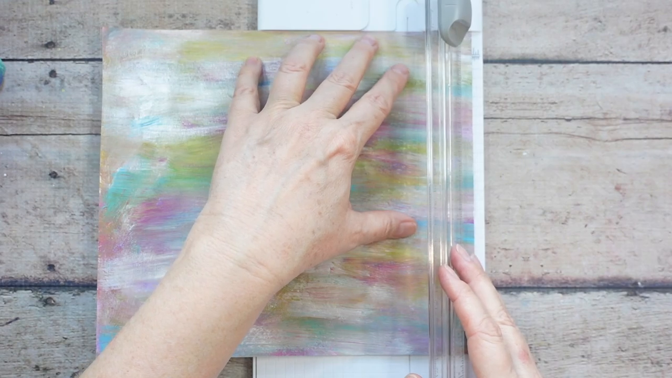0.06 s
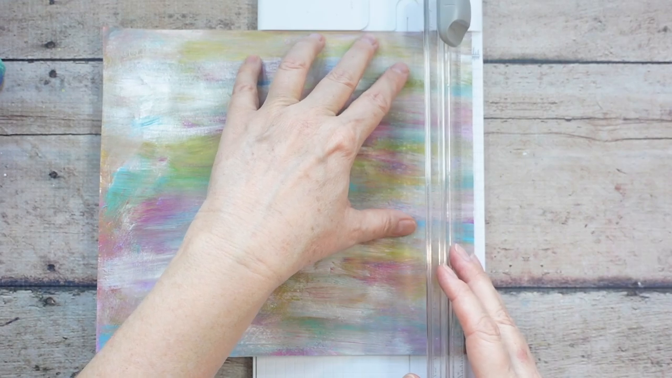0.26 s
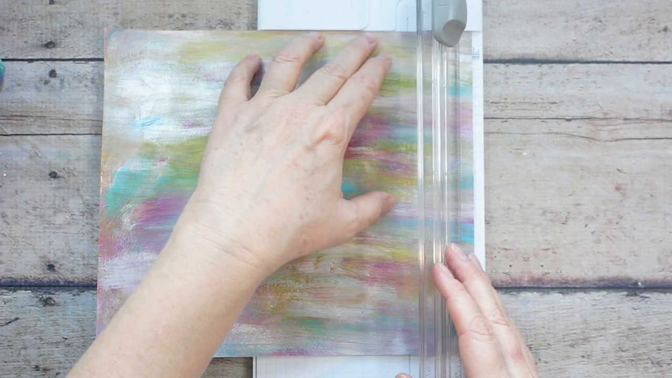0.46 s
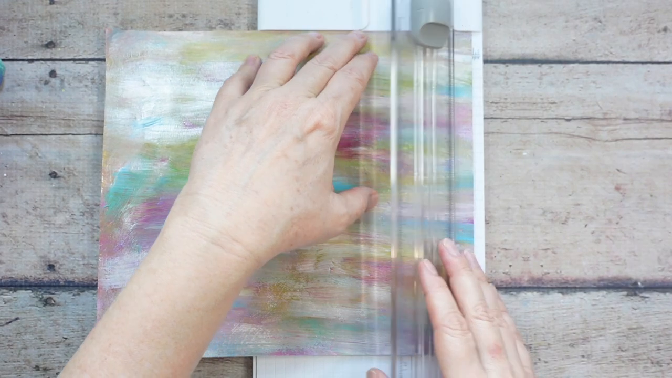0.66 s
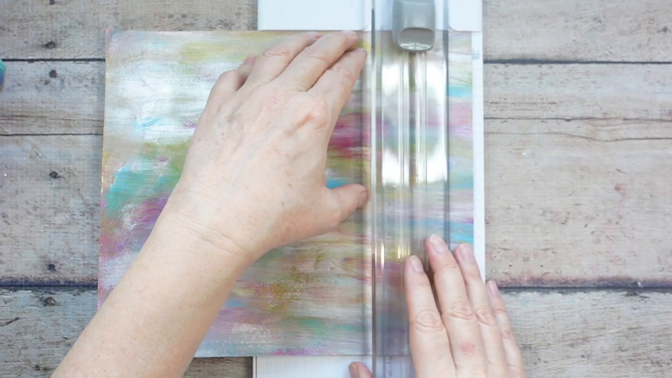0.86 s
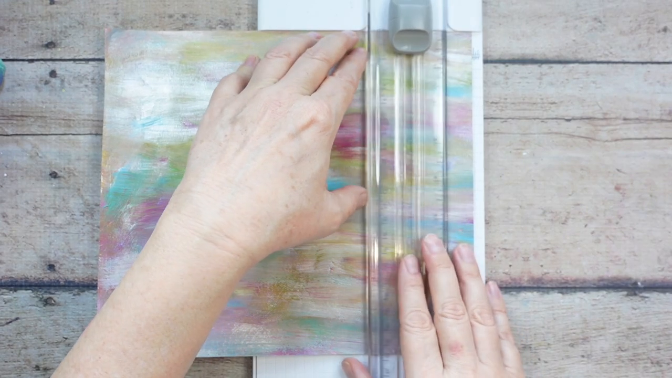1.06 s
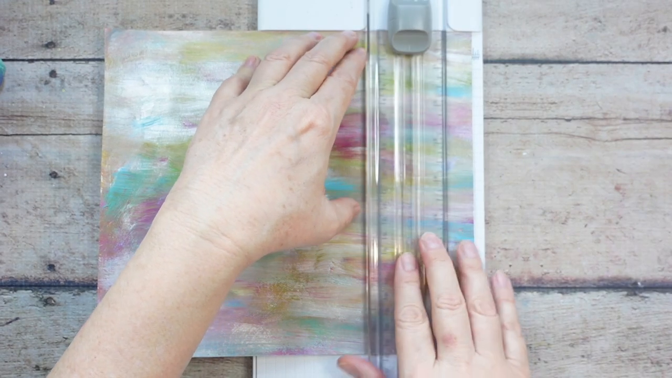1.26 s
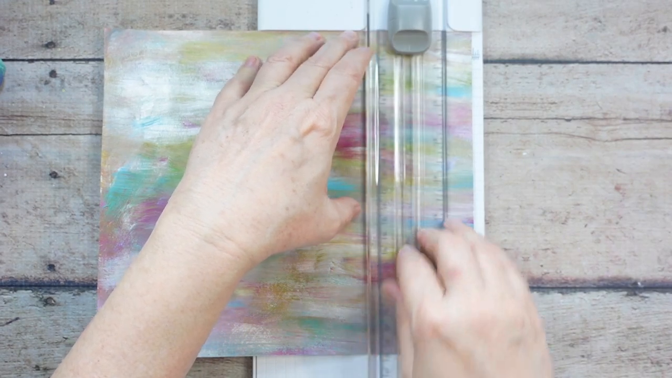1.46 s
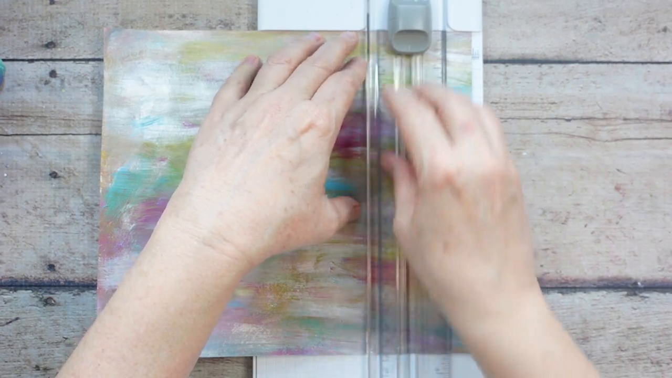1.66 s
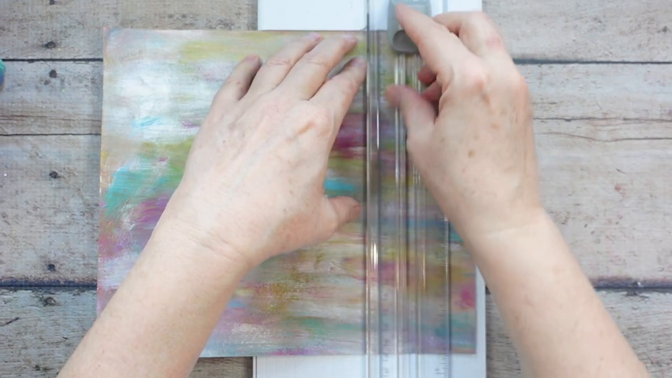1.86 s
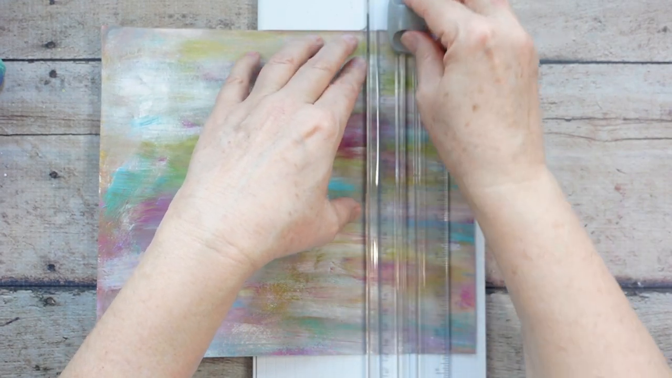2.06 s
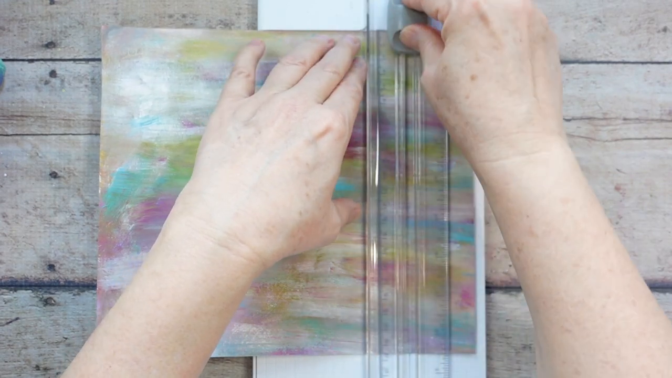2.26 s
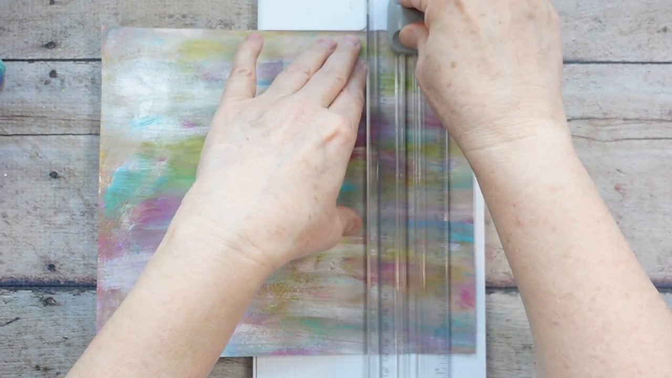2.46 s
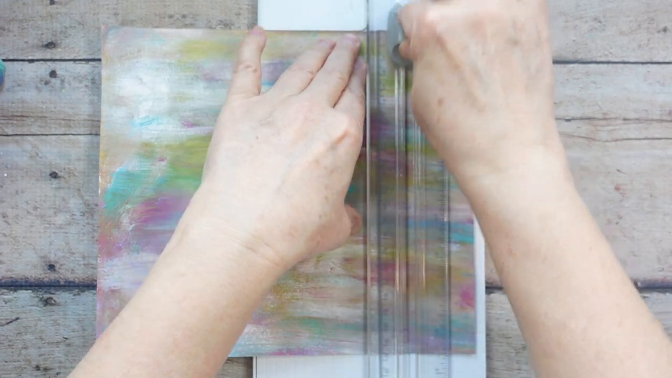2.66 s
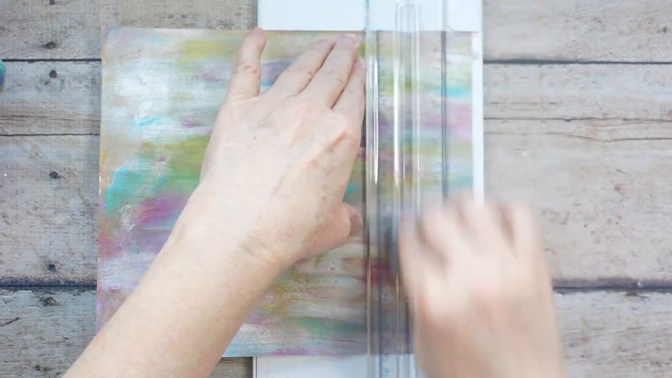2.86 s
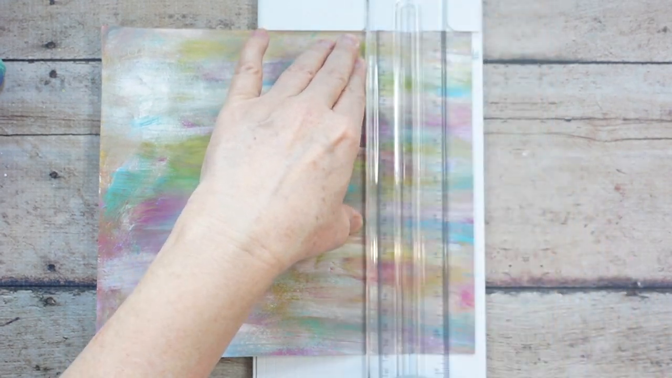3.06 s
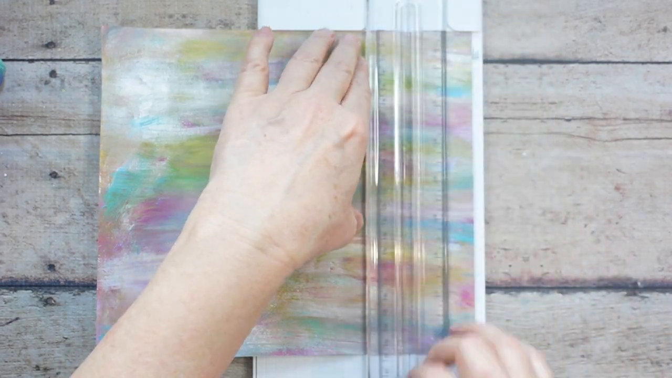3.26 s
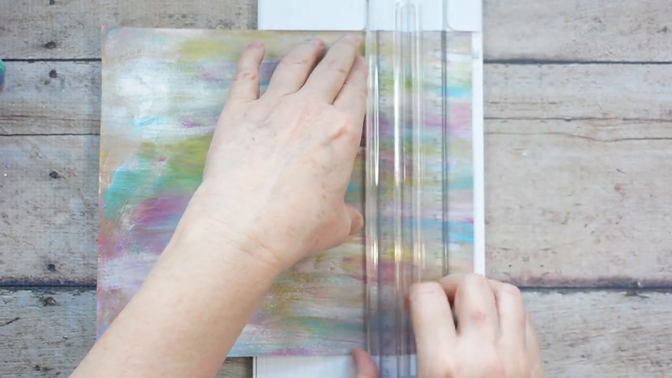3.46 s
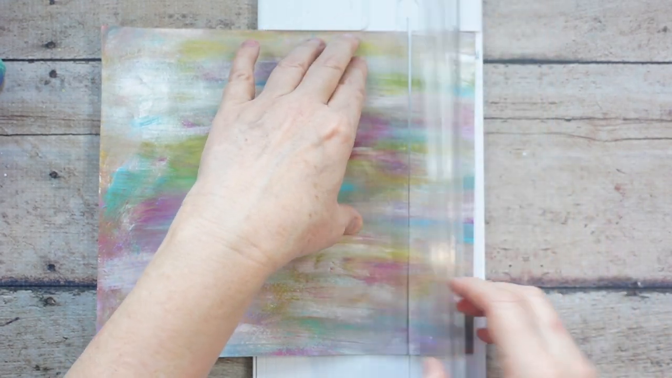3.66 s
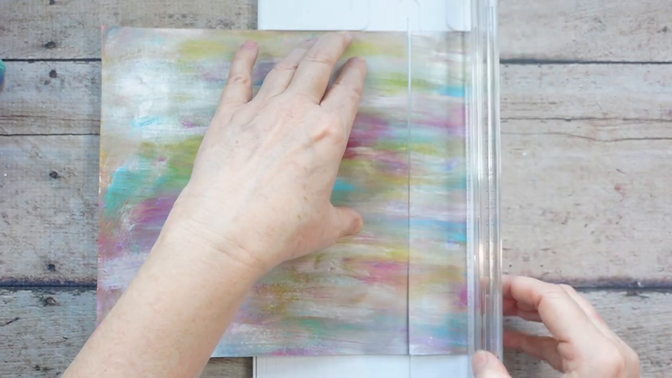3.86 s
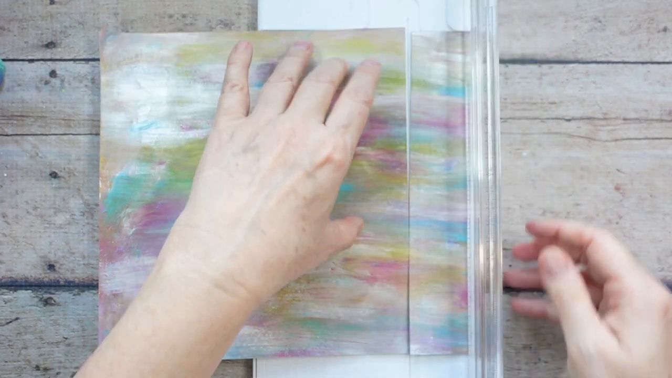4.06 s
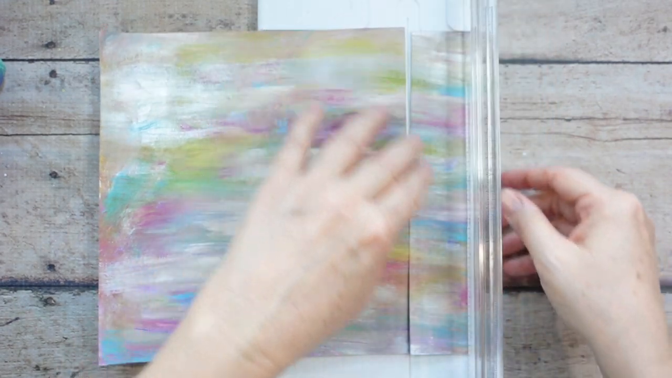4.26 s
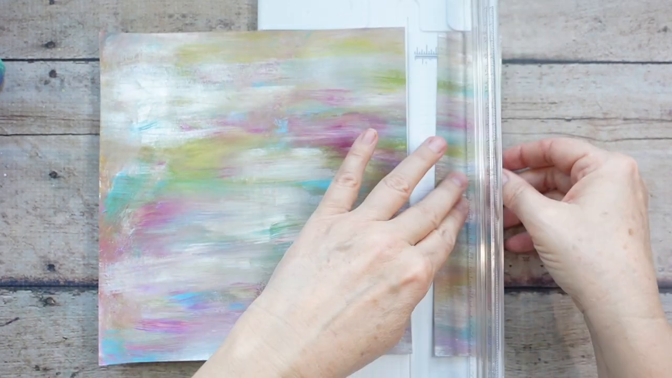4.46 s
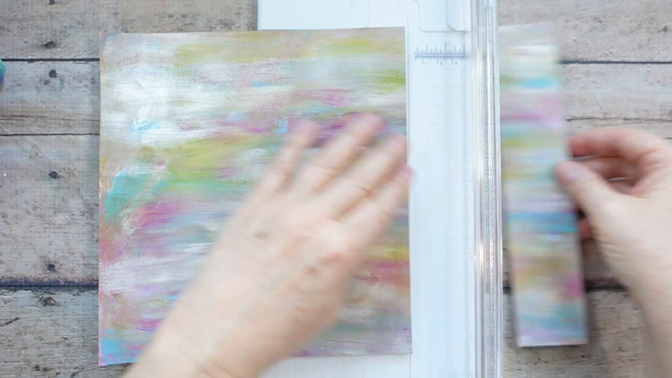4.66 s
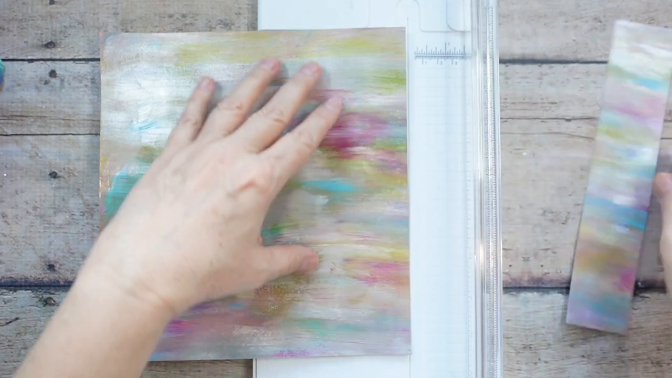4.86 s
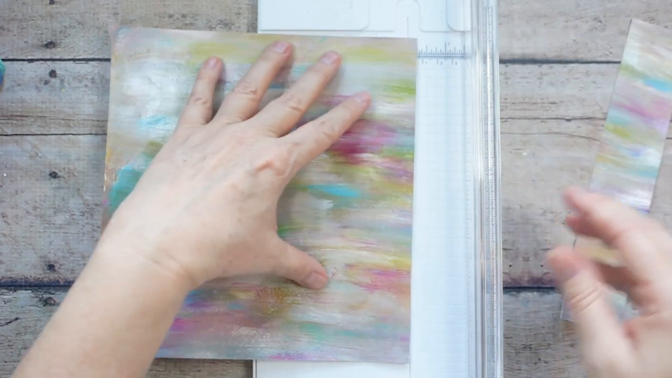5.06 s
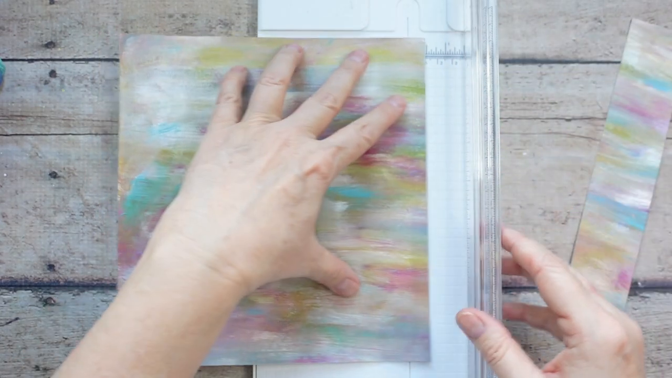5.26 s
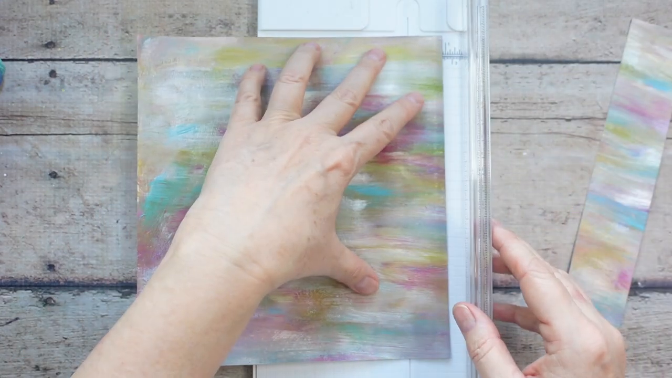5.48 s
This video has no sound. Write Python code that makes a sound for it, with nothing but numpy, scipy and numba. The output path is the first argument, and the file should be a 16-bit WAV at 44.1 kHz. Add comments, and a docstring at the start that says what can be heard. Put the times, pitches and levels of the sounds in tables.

```python
"""A paper trimmer's blade cuts a sheet in one stroke: the carriage judders along its plastic rail and
shakes trimmer and table, while the blade snaps fibres and sings in its slot. Before the cut the sheet
is slid under the rail; after it the rail is lifted with a clatter, the strip is pulled out and laid
aside, and the sheet is pushed back. Fingers knock and rub on the plastic; paper drags over the board
and its edges snap free. Heard close up, in a small room with a faint fan."""
import sys
import numpy as np
from scipy import signal
from scipy.fft import rfft, irfft
from scipy.io import wavfile
from scipy.ndimage import uniform_filter1d
from numba import njit

SR = 44100
rng = np.random.default_rng(int(sys.argv[2]) if len(sys.argv) > 2 else 0)


def to_wav(sig):
    """Store sig (one row per channel, or 1-D mono) as 16-bit WAV at the path in sys.argv[1].

    Samples outside -1..1 are clipped; the rate is SR.
    """
    pcm = np.clip(np.atleast_2d(sig), -1, 1) * 32767
    pcm = np.round(pcm).astype(np.int16)
    wavfile.write(sys.argv[1], SR, pcm.T)  # frames by channels


N = 243431
TIME = np.arange(N) / SR
AGE = np.arange(8192) / SR  # seconds since a blow

# The pull of the blade. Each row: time in seconds, then faders in dB for carriage rasp and tearing.
STROKE = [(2.62, -75, -82), (2.668, -45.5, -53), (2.71, -39, -45.5), (2.745, -49, -44), (2.805, -34, -35.5),
          (2.92, -32.5, -31), (3.041, -42, -45), (3.11, -61.5, -62.5), (3.19, -99, -77)]
# The blade sings as it starts, runs and leaves the paper.
# Each row: centre and half length in seconds, pitch in Hz, level in dB.
WHISTLES = [(2.692, 0.031, 8370, -51), (2.927, .08, 8500, -46.5), (3.034, 0.02, 6960, -45.5)]
# Ringing of trimmer and table. Each row: pitch in Hz, relative level in dB, 60 dB decay in seconds.
TRIMMER_MODES = [(80, -9, .18), (112, -5, .16), (168, -5, .18), (205, -8, .08), (300, -7, .06),
                 (363, -8, .11), (520, -2, .06), (630, -2, .05), (733, 1, .11), (848, -1, .07),
                 (1037, 1, .11), (1101, -1, .1), (1167, 0, .1), (1234, 0, .1), (1371, 1, .09),
                 (1425, -2, .06), (1549, -2, .05), (1647, -3, .04), (1724, -3, .04)]
# Tone of carriage rasp, tearing fibres and table rumble. Each row: frequency in Hz, gain in dB.
RASP_EQ = [(30, -75), (240, -28), (400, -21), (520, -10), (740, 5), (1060, -0.5), (1500, 3.5), (2400, 10),
           (4000, -15), (8000, -66)]
TEAR_EQ = [(30, -109), (1200, -2), (2000, -5.5), (2900, -2.5), (4100, 1), (5200, 1), (7000, -0.5),
           (8500, -0.5), (11300, -10), (13200, -10), (15800, -29)]
RUMBLE_EQ = [(20, -83), (45, -33), (70, -28), (110, -18.5), (170, -9.5), (240, -6.5), (340, 4), (500, 0.5),
             (800, -24.5)]

# Knocks of fingers, rail and carriage. Each row: start in seconds, shell fader in dB,
# main ring in Hz, table thud fader in dB, contact click fader in dB.
KNOCKS = [(0.641, -54.5, 1150, -88, -62), (1.103, -47.5, 562, -69.5, -49), (1.519, -47.5, 1300, -68.5, -60),
          (1.619, -61, 890, -79, -59), (1.684, -52.5, 854, -67, -63.5), (2.095, -55, 870, -89, -57.5),
          (2.118, -56.5, 1910, -82, -50.5), (2.143, -52.5, 1310, -77, -81),
          (2.273, -50.5, 1327, -69, -52.5), (2.595, -65, 860, -91, -62), (2.645, -52, 990, -82, -57),
          (2.922, -23, 1160, -67, -44), (3, -31.5, 1320, -54, -40), (3.069, -40, 1375, -71, -45),
          (3.224, -40, 533, -65.5, -51.5), (3.256, -43, 1260, -66.5, -56), (3.307, -40.5, 1350, -84, -57.5),
          (3.395, -52.5, 1290, -70.5, -50.5), (3.514, -41.5, 841, -64, -51), (3.819, -43.5, 827, -63, -64),
          (3.844, -39.5, 1410, -64, -60), (3.891, -39.5, 1400, -67, -61), (4.081, -51, 860, -82.5, -57),
          (4.474, -47, 1505, -71.5, -65), (4.602, -42, 873, -85, -54), (5.359, -69, 980, -70.5, -69)]
# Fingers and hinge rubbing on the rail. Each row: centre and half length in seconds,
# skin hiss in dB, rail rattle in dB, rattle centre in Hz, squeak in dB.
RUBS = [(1.574, 0.0099, -60, -58, 900, -66), (1.59, 0.13, -78, -69.5, 380, -100),
        (1.837, 0.095, -77.5, -73.5, 500, -75.5), (2.351, 0.029, -64.5, -61, 700, -99),
        (3.231, 0.014, -65, -52, 520, -88), (3.497, 0.024, -61, -59.5, 1220, -75),
        (3.849, 0.021, -77, -48.5, 1490, -81), (3.898, 0.021, -72, -48.5, 1490, -95),
        (4.617, 0.012, -51.5, -62, 1510, -66)]
# Tone of plastic shell, table thud, clicks and skin. Each row: frequency in Hz, gain in dB.
SHELL_EQ = [(30, -52), (200, -30.5), (450, -0.5), (800, 4.5), (1400, 1), (2200, 0.5), (3500, -9.5),
            (5000, -7), (7000, -40), (12000, -66)]
THUD_EQ = [(20, -86), (45, -38), (70, -4.5), (120, 4), (200, 4), (350, 3), (700, -33), (2000, -94)]
CLICK_EQ = [(100, -42), (1000, -4), (2500, -10), (4500, -3), (9000, -13), (15000, -30)]
SKIN_EQ = [(300, -63), (2000, -4), (4500, 5), (7000, 0), (10000, -9), (15000, -19)]

# Paper edges snapping and ticking. Each row: start in seconds, level in dB, ring pitch in Hz,
# its 60 dB decay in seconds, then crack and flutter in dB relative to the level.
SNAPS = [(0.639, -35.5, 3300, 0.003, -7, -10), (1.0941, -31.5, 3840, 0.0031, -20, -43),
         (1.1, -33.5, 4170, 0.0022, -19, -19), (1.318, -61.5, 4500, 0.0036, 7, -16),
         (1.347, -59.5, 4430, 0.0031, 5, -11), (3.329, -55, 2600, 0.004, -4, -18),
         (3.804, -63, 6100, 0.0022, 8, -9), (4.149, -50.5, 6430, 0.0049, -6, -14),
         (4.0048, -21, 3050, 0.0046, -17.5, -25), (4.068, -52.5, 3150, 0.048, -17, -12),
         (4.6712, -32.5, 2380, 0.052, -23, -8), (4.68, -29.5, 2200, 0.013, -17, -35),
         (4.8063, -40, 2690, 0.014, -14, -10.5), (4.911, -40, 7040, 0.0059, -9, -7.5)]
# Pushes of sheet and strip. Each row: start, rise and hold in seconds, first and last edge pitch in Hz,
# then faders in dB for hiss, edge ring, broad sheet ring and board scrape.
SLIDES = [(0.314, 0.16, 0.092, 3440, 3150, -67.5, -67.5, -86, -80),
          (0.606, 0.033, 0.16, 3230, 3120, -75.5, -74.5, -75.5, -72.5),
          (1.14, .045, 0.042, 3370, 3330, -73, -71, -79, -84),
          (1.28, 0.027, 0.048, 3450, 3430, -76, -96, -96, -94),
          (4.36, 0.045, 0.058, 4900, 2530, -49, -67, -60.5, -62.5),
          (4.49, .02, 0.031, 3520, 3500, -70.5, -77, -84, -75),
          (4.551, 0.011, 0.049, 4620, 3920, -66, -63.5, -58, -63),
          (4.631, 0.036, .003, 2660, 2350, -66, -56, -52, -56.5),
          (4.803, .008, 0.096, 2570, 4440, -69.5, -58, -56.5, -69),
          (4.955, 0.21, 0.058, 4300, 5300, -69, -64.5, -61.5, -68),
          (5.229, 0.08, 0.089, 4700, 4750, -56.5, -69, -71, -60.5)]
# Tone of paper hiss and board scrape. Each row: frequency in Hz, gain in dB.
HISS_EQ = [(300, -72), (2500, -12), (4500, -3), (7000, -5), (9000, -10), (12000, -18), (15500, -46)]
SCRAPE_EQ = [(40, -34), (150, -12), (400, -14.5), (900, 1.5), (1600, -0.5), (2500, -5.5), (5000, -24)]

# Tone of the room noise. Each row: frequency in Hz, gain in dB.
AIR_EQ = [(18, -101), (30, -54), (114, -16), (402, -13), (483, -13), (628, -14), (883, -1.5), (1060, -16),
          (1450, -9.5), (2390, -19), (15800, -32.5)]
# Resonances of the fan. Each row: centre in Hz, filter width in Hz, relative gain in dB.
FAN_RESONANCES = [(871.8, 24.6, -9.5), (952, 100, -19.5), (1416, 220, -35), (1872, 56, -23)]

RUMBLE_DB, RUMBLE_GROWTH = -43.5, 1.68  # table rumble at full pull, and dB gained per dB of rasp
CONTACT_S = 0.0019  # time for a blow to build up
SLIDE_RELEASE_S = 0.17  # a push dies away by 60 dB in this time
GLIDE_BEND = 3.1  # the edge pitch moves slowly at first, then faster
HISS_DB_PER_OCT, SCRAPE_DB_PER_OCT = 19, -9.5  # a rising edge pitch brings more hiss, less scrape
AIR_DB, TOP_HZ = -68, 15850


def blade_stroke():
    """The carriage judders along the rail and shakes the trimmer while the blade snaps fibres."""
    times, rasp_db, tear_db = np.transpose(STROKE)
    pull = swell(times, rasp_db)
    grip = walk(260)  # the blade catches and frees itself
    judder = slips(rate=3400, spread_db=2.5) * undb(2.2 * grip)
    body = unit(through(judder, trimmer_ring(dense_db=1, dense_t60=.05))) + undb(-6) * judder
    rasp = undb(-1.5) * unit(colour(body, RASP_EQ)) * pull
    rumble = undb(RUMBLE_DB) * unit(colour(body, RUMBLE_EQ)) * (pull / pull.max()) ** RUMBLE_GROWTH
    fibres = slips(rate=12000, spread_db=2.5) * undb(.6 * grip)
    # the steel blade colours the tearing with its own short rings
    steel = sum(resonate(fibres, hz, width=80) for hz in (3940, 4190, 5980, 7800))
    tear = undb(-1.47) * unit(colour(fibres + undb(-5) * steel, TEAR_EQ)) * swell(times, tear_db)
    chatter = slips(rate=13000, spread_db=5.5)
    whistle = sum(undb(db) * bump(centre, half) * unit(steep_band(chatter, hz, width=920))
                  for centre, half, hz, db in WHISTLES)
    return rasp + rumble + tear + whistle


def trimmer_ring(dense_db, dense_t60):
    """Trimmer and table answer a tap with clear modes among many short-lived ones."""
    clear = sum((-1) ** k * undb(db) * np.sin(2 * np.pi * hz * AGE) * fade(t60)
                for k, (hz, db, t60) in enumerate(TRIMMER_MODES))
    dense = rng.standard_normal(len(AGE)) * fade(dense_t60)
    return unit(clear) + undb(dense_db) * unit(dense)


def plastic_knocks():
    """Each blow clicks at the contact, rings the plastic shell and thuds into the table."""
    out = np.zeros(N)
    attack = 1 - np.exp(-AGE / CONTACT_S)
    click_shape = fade(0.0042) * attack + undb(-18) * fade(0.053)
    for start, shell_db, hz, thud_db, click_db in KNOCKS:
        ring = trimmer_ring(dense_db=14, dense_t60=0.04) * attack
        # the place struck favours one briefly ringing mode
        main_mode = unit(np.sin(2 * np.pi * hz * AGE) * fade(.035) * attack)
        shell = unit(colour(ring * fade(0.05), SHELL_EQ)) + undb(0.5) * main_mode
        thud = unit(colour(ring, THUD_EQ))
        click = unit(colour(rng.standard_normal(len(AGE)) * click_shape, CLICK_EQ))
        knock = undb(shell_db - 23) * shell + undb(thud_db - 8) * thud + undb(click_db - 17.5) * click
        add(out, start, knock)
    return out


def rail_rubs():
    """Skin whispers and squeaks on the rail, which rattles low under a finger, higher in its hinge."""
    skin = unit(colour(slips(rate=12000, spread_db=1.5), SKIN_EQ))
    shaken = through(slips(rate=1500, spread_db=0.5), trimmer_ring(dense_db=19.5, dense_t60=0.03))
    shell = unit(colour(shaken, SHELL_EQ))
    squeak = unit(resonate(skin, hz=10200, width=990))
    out = np.zeros(N)
    for centre, half, skin_db, rattle_db, hz, squeak_db in RUBS:
        rattle = unit(resonate(shell, hz, width=1.43 * hz))
        rub = undb(skin_db) * skin + undb(rattle_db) * rattle + undb(squeak_db) * squeak
        out += bump(centre, half) * rub
    return out


def paper_snaps():
    """A paper edge springs free: a crack, a brief ring of the sheet, then flutter."""
    out = np.zeros(N)
    for start, db, hz, t60, crack_db, flutter_db in SNAPS:
        ring = resonate(np.sin(2 * np.pi * hz * AGE) * fade(t60), hz, width=4300)
        crack = unit(colour(rng.standard_normal(len(AGE)), CLICK_EQ)) * fade(0.009)
        flutter = unit(steep_band(rng.standard_normal(len(AGE)), hz, width=0.98 * hz)) * fade(0.095)
        add(out, start, undb(db) * (ring + undb(crack_db) * crack + undb(flutter_db) * flutter))
    return out


def paper_slides():
    """Paper drags over the board; as its free length changes, the edge resonance glides."""
    drag = undb(0.74 * walk(110))
    hiss = unit(colour(slips(rate=11000, spread_db=-1), HISS_EQ))
    scrape = unit(colour(slips(rate=5400, spread_db=1), SCRAPE_EQ))
    edge_slips, sheet_slips = slips(rate=7500, spread_db=3.5), slips(rate=10000, spread_db=5.5)
    out = np.zeros(N)
    for start, rise, hold, from_hz, to_hz, hiss_db, edge_db, sheet_db, scrape_db in SLIDES:
        span = (TIME >= start) & (TIME < start + rise + hold + SLIDE_RELEASE_S)
        age = TIME[span] - start
        release = undb(-60 * np.maximum(age - rise - hold, 0) / SLIDE_RELEASE_S)
        push = np.minimum(age / rise, 1) * release
        octaves = np.log2(to_hz / from_hz) * np.minimum(age / (rise + hold), 1) ** GLIDE_BEND
        hz = from_hz * 2 ** octaves
        edge = unit(steep_band(edge_slips[span], hz, width=440))
        sheet = unit(steep_band(sheet_slips[span], hz, width=2700))
        friction = undb(hiss_db + HISS_DB_PER_OCT * octaves) * hiss[span]
        friction += undb(scrape_db + SCRAPE_DB_PER_OCT * octaves) * scrape[span]
        add(out, start, push * (friction + undb(edge_db) * edge + undb(sheet_db) * sheet))
    return drag * out


def reflections(x, t60, count=22050):
    """The small room returns a diffuse tail that builds up over a few milliseconds."""
    tail = rng.standard_normal(count) * (fade(t60, count) - fade(0.0015, count))
    tail = colour(tail, [(30, -33), (150, 2), (1000, -2), (4000, -1.5), (15000, 1.5)])
    return through(x, tail / np.sqrt(np.sum(tail ** 2)))


def room_tone(fan_db):
    """A bed of diffuse room noise with the wavering resonances of a fan."""
    fan = sum(undb(db) * steep_band(rng.standard_normal(N), hz, width)
              for hz, width, db in FAN_RESONANCES)
    air = colour(rng.standard_normal(N), AIR_EQ)
    return undb(AIR_DB) * (unit(air) + undb(fan_db) * unit(fan))


def slips(rate, spread_db):
    """Tiny stick-slip releases of scattered size, at random, about `rate` a second."""
    moments = rng.random(N) < rate / SR
    return unit(moments * rng.standard_normal(N) * undb(spread_db * rng.standard_normal(N)))


def walk(rate):
    """A random wobble with a spread near 1, heading for a new value `rate` times a second."""
    knots = rng.standard_normal(N // 20)
    return 1.26 * np.interp(TIME * rate, np.arange(len(knots)), knots)


def fade(t60, count=8192):
    """A decay that loses 60 dB in t60 seconds."""
    return np.exp(-np.log(1000) * np.arange(count) / SR / max(t60, 1e-4))


def swell(times, db):
    """A smoothed fader ride through the given levels, silent outside them."""
    gain = undb(np.interp(TIME, times, db)) * (TIME >= times[0]) * (TIME <= times[-1])
    return np.abs(uniform_filter1d(gain, size=256))


def bump(centre, half):
    """A bell-shaped swell and fall, timed in seconds."""
    return np.exp(-((TIME - centre) / half) ** 2)


def colour(x, points, size=4096):
    """A minimum-phase EQ drawn through (Hz, dB) points."""
    hz, db = np.transpose(points)
    bins = np.maximum(np.arange(size // 2 + 1) * SR / size, 1)
    gain = undb(np.interp(np.log(bins), np.log(hz), db))
    cepstrum = irfft(np.log(gain))
    cepstrum[1:size // 2] *= 2
    cepstrum[size // 2 + 1:] = 0
    return through(x, irfft(np.exp(rfft(cepstrum))))


@njit
def svf(x, hz, width):
    """A state-variable band-pass whose centre can move every sample."""
    y, band_state, low_state = np.empty(len(x)), 0., 0.
    for i in range(len(x)):
        tuning, damping = np.tan(np.pi * hz[i] / SR), width / hz[i]
        band = (band_state + tuning * (x[i] - low_state)) / (1 + tuning * (tuning + damping))
        band_state = 2 * band - band_state
        low_state += 2 * tuning * band
        y[i] = damping * band
    return y


def resonate(x, hz, width):
    """One resonance, steady or gliding, with its width in Hz."""
    return svf(x, hz * np.ones(len(x)), float(width))


def steep_band(x, hz, width):
    """The same resonance twice in series, for steeper skirts."""
    return resonate(resonate(x, hz, width), hz, width)


def through(x, response):
    """Pass a sound through an impulse response."""
    return signal.fftconvolve(x, response)[:len(x)]


def add(out, start, x):
    """Mix a sound in at `start` seconds."""
    i = int(start * SR)
    out[i:i + len(x)] += x[:N - i]


def undb(db):
    """Decibels to gain."""
    return 10 ** (np.asarray(db) / 20)


def unit(x):
    """Scale to rms 1."""
    return x / np.sqrt(np.mean(x ** 2))


def scene():
    """The direct sound sits in the centre; reflections, mostly of the knocks, give a little width."""
    stroke = blade_stroke()
    plastic = plastic_knocks() + rail_rubs()
    paper = paper_snaps() + paper_slides()
    reverb_send = undb(-16.5) * stroke + plastic + undb(-6) * paper
    mid = stroke + plastic + paper + undb(-3.5) * reflections(reverb_send, t60=0.54)
    side = undb(-9.5) * reflections(reverb_send, t60=0.54)
    # each channel has its own room noise; the fan stands to the left
    return np.array([mid + side + room_tone(fan_db=0.5), mid - side + room_tone(fan_db=-26)])


def record(dry):
    """A steep low-pass takes off the very top."""
    return signal.sosfilt(signal.ellip(10, .1, 70, TOP_HZ, fs=SR, output="sos"), dry)


dry = scene()
out = record(dry)
to_wav(out)
```